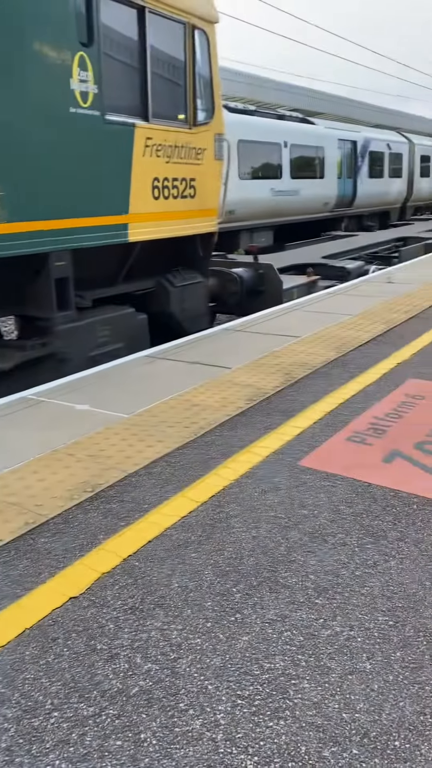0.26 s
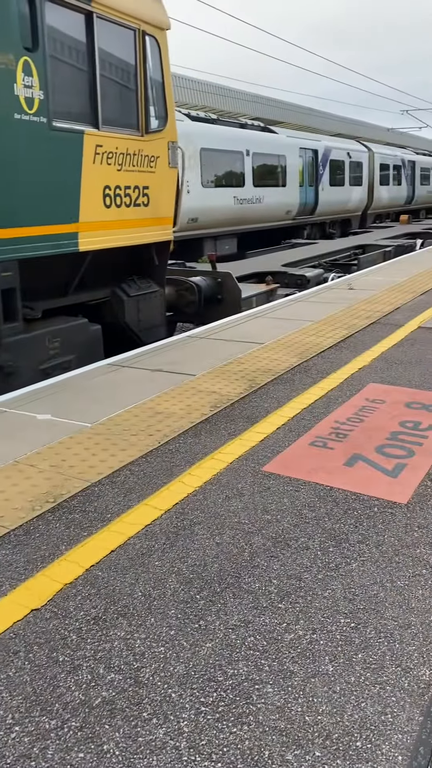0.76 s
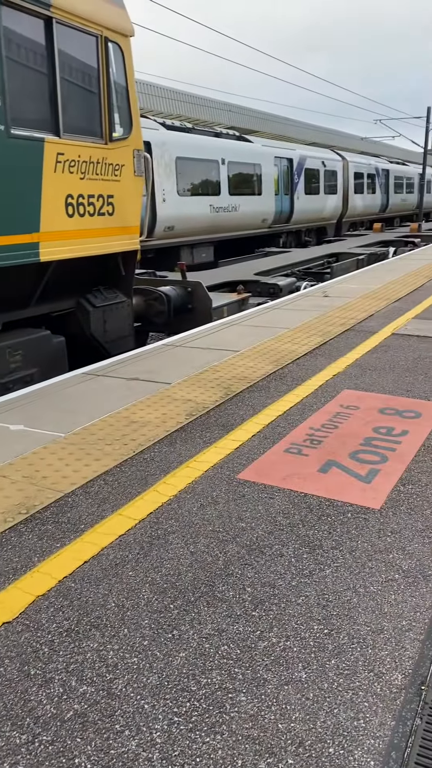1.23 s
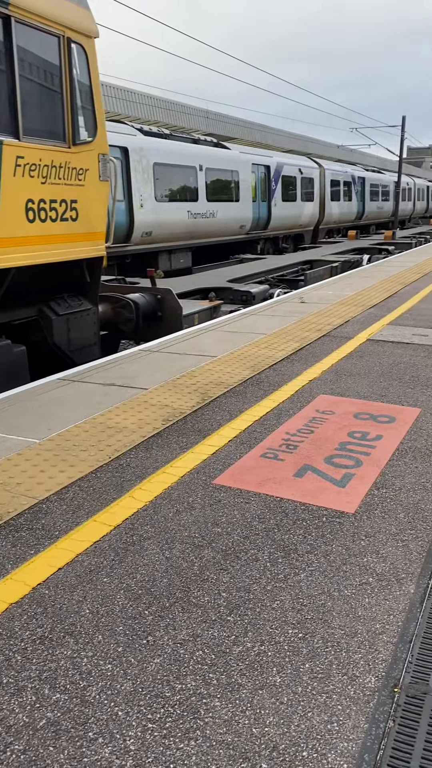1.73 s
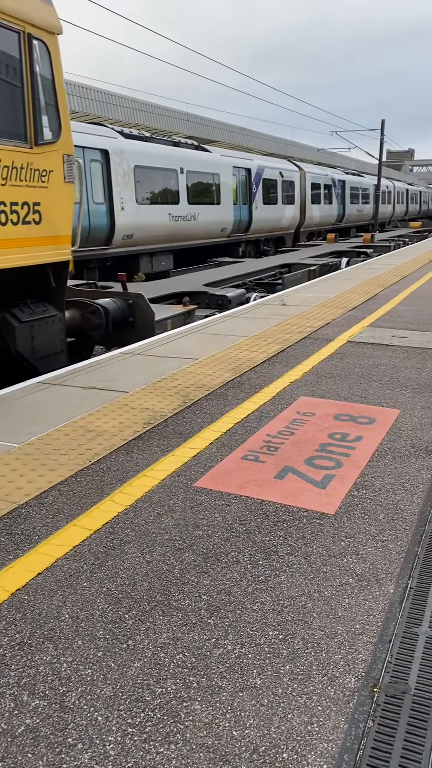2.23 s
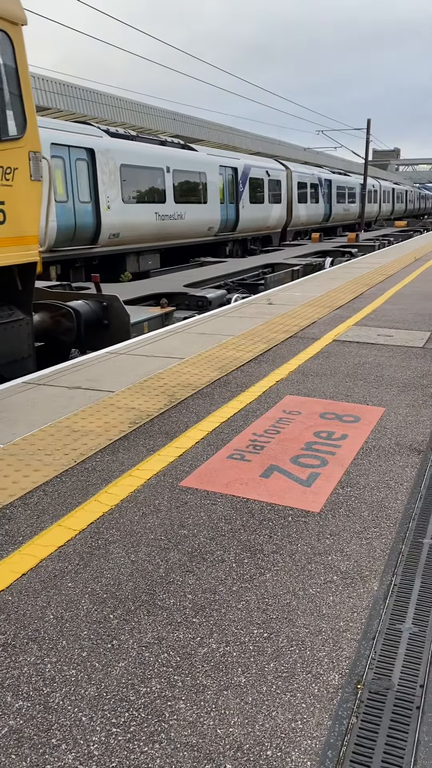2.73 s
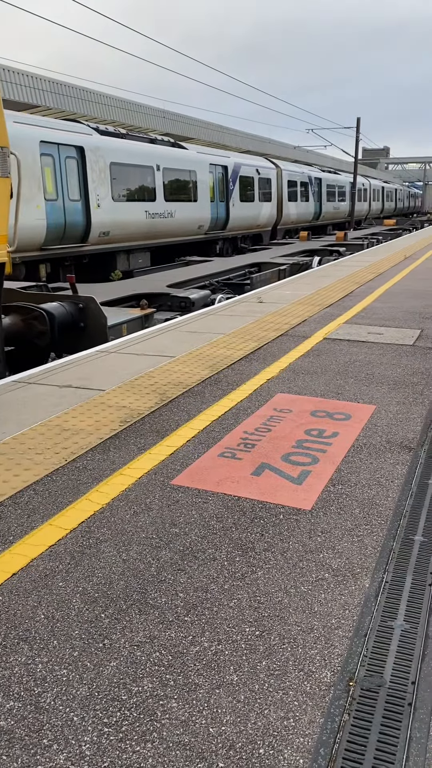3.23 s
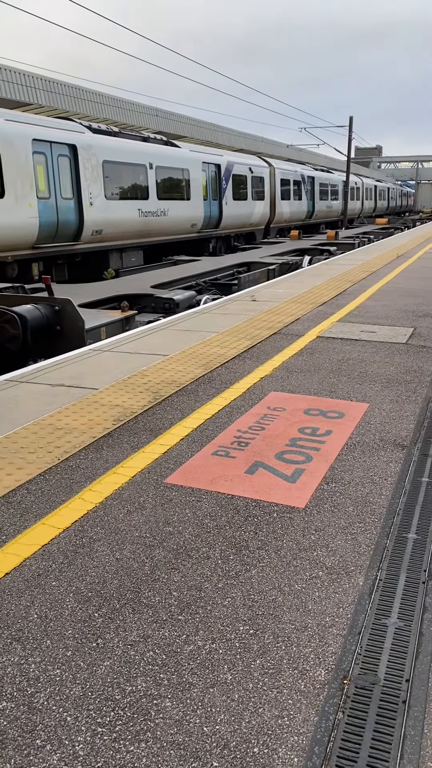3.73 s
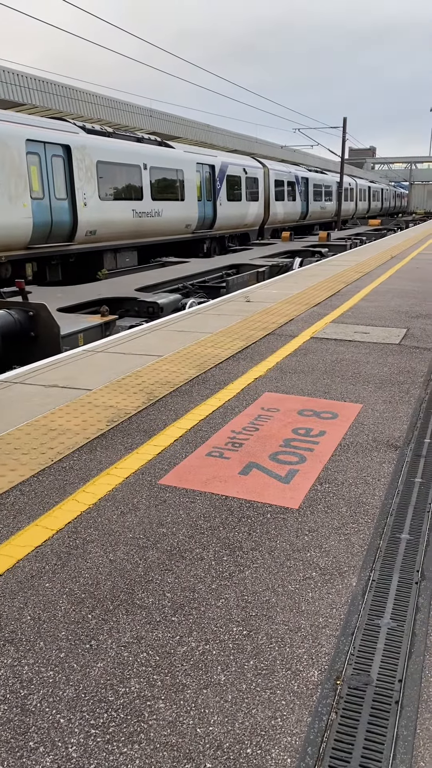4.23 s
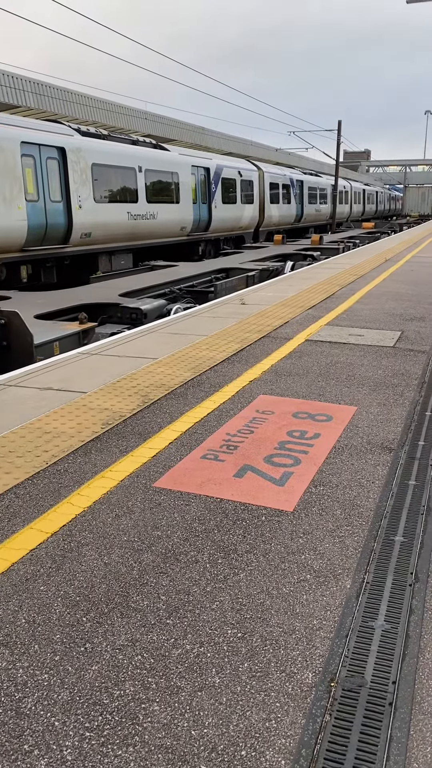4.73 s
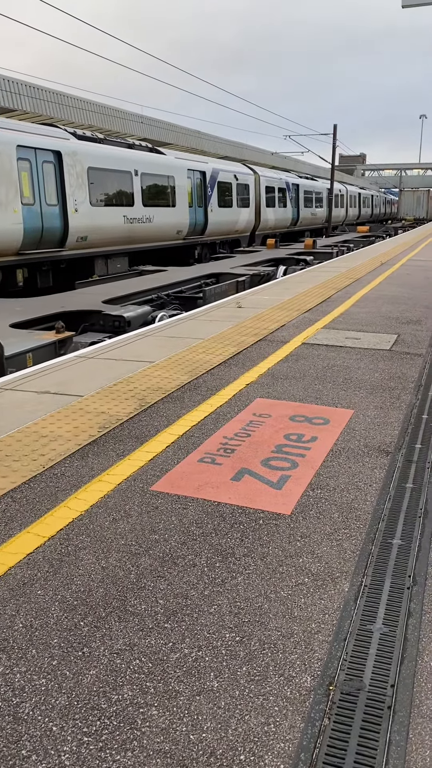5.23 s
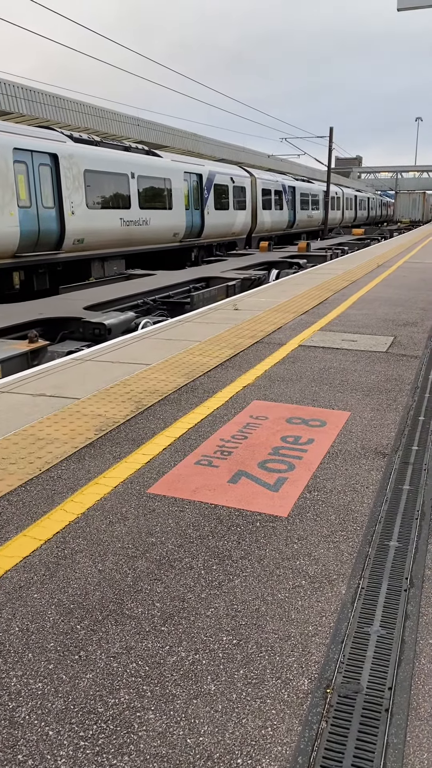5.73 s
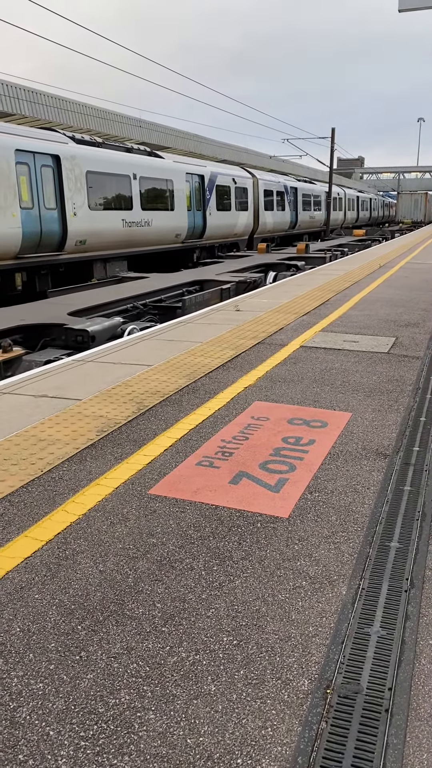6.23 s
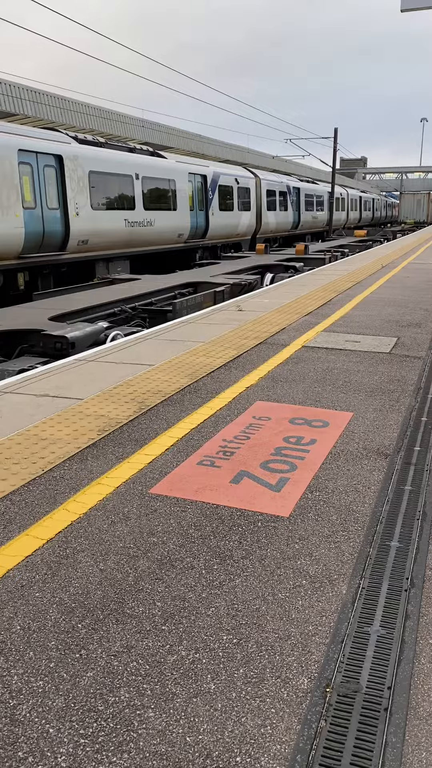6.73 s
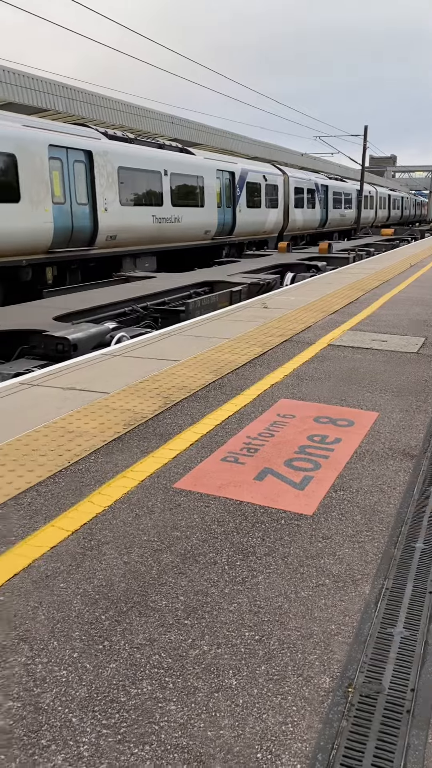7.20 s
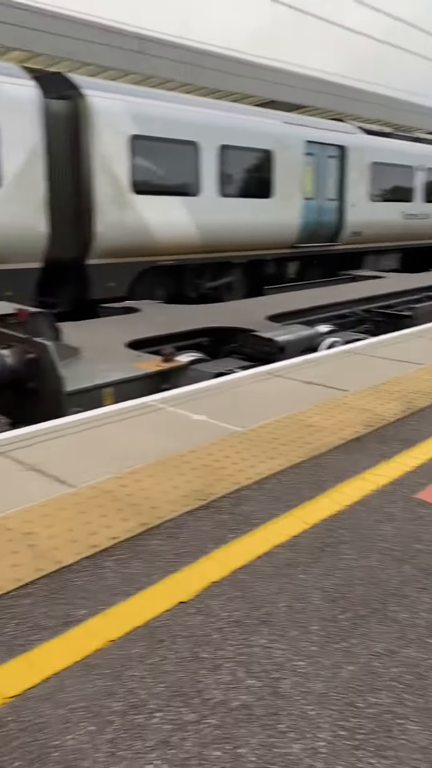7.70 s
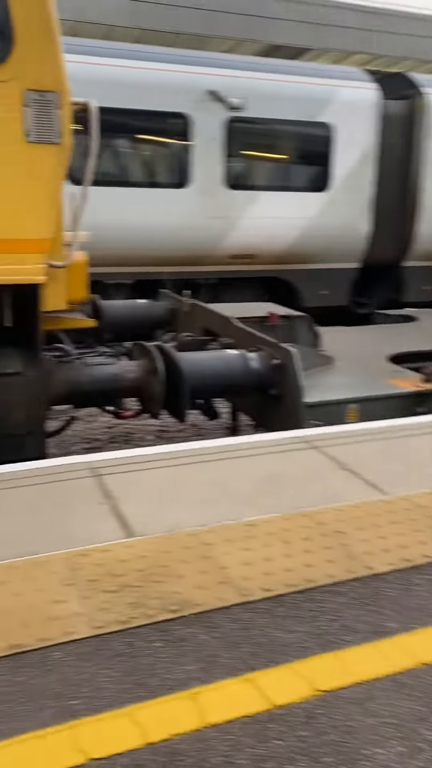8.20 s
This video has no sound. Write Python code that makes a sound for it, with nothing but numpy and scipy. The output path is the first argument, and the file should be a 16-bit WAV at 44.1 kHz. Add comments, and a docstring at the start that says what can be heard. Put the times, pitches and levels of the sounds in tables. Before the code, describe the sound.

A heavy low diesel throb dominates, covered by mechanical clatter, a hollow drone and wavering gear and turbocharger whines. Early on a metallic squeal sings upward for under a second. Halfway through, the engine begins speeding up and all its tones climb together, growing hoarser. Empty wagons roll by with uneven rumble and soft frame booms, and escaping air hisses late. Outdoor platform, close stereo phone-like pickup, no speech.

```python
"""A two-stroke diesel locomotive draws container flats slowly along a station platform.
Its exhaust throbs once a crank turn, as neighbouring low tones fall into step.
Gears, turbocharger and auxiliaries whine, and their pitch climbs as the engine is notched up.
A wheel flange squeals briefly as a rising tone; wagon rumble, jolts and hissing air are shaped from
filtered noise and short rings."""
import sys
import numpy as np
from scipy import signal
from scipy.fft import rfft, irfft, next_fast_len
from scipy.io import wavfile
from scipy.ndimage import uniform_filter1d, map_coordinates

SR = 44100
rng = np.random.default_rng(int(sys.argv[2]) if len(sys.argv) > 2 else 0)


def materialize(psi):
    """Save the field psi as 16-bit PCM at rate SR to the path in sys.argv[1].

    A 1-D psi becomes a single channel; in a 2-D psi each row is a channel.
    """
    bounded = np.clip(np.atleast_2d(psi).T, -1, 1)
    quanta = np.round(bounded * 32767).astype(np.int16)
    wavfile.write(sys.argv[1], SR, quanta)


N = 373086
TIME = np.arange(N) / SR

# crankshaft speed: (time [s], speed [turns per second])
SHAFT = [(0, 8.149), (1.6, 8.168), (2.4, 8.147), (4.4, 8.147), (4.8, 8.196), (5.2, 8.288), (5.6, 8.421),
         (6.4, 8.766), (7.2, 9.215), (8.46, 9.943)]
# the low multiples of the crank speed that make up the throb: (order)
THROB_ORDERS = [6, 7, 8, 9]
# exhaust surge within a turn: (time [s], delay [turns], smear by echoes [turns per order])
SURGE = [(0, 1.02, .15), (2, 1.04, .2), (4.8, 1.07, .25), (5.5, 1.15, .16), (6.1, 1.11, .23),
         (6.5, .65, -.06), (7.3, .72, -.22), (7.8, .79, -.25), (8.46, 1.06, .11)]
# how the engine's noises grow, before a fixed lift: (time [s], clatter [dB], cooling air [dB])
AIR = [(0, -35.5, -42), (1.9, -34, -40.5), (5, -34, -40.5), (6, -33, -38.5), (7.1, -34.5, -36.5),
       (7.6, -33, -38.5), (8.25, -29.5, -36), (8.46, -31, -35)]


def amp(db):
    """Turn decibels into gain."""
    return 10 ** (np.asarray(db) / 20)


def unit(x):
    """Scale to rms 1."""
    return x / np.sqrt(np.mean(x ** 2) + 1e-20)


def along(points, hz):
    """Read (frequency, value) points along a logarithmic frequency axis."""
    f, v = np.transpose(points)
    return np.interp(np.log(hz + 1), np.log(f + 1), v)


def curves(rows):
    """Draw each column after the time as a curve with one value per sample."""
    s, *cols = np.transpose(rows)
    return [np.interp(TIME, s, c) for c in cols]


def wobble(rate):
    """Draw a smooth random curve with this many knots a second."""
    knots = rng.standard_normal(8192)
    coarse = TIME[::16]
    return np.interp(TIME, coarse, map_coordinates(knots, [coarse * rate], mode="wrap"))


def filtered(x, response):
    """Multiply the spectrum of x by a response that depends on frequency."""
    m = next_fast_len(N + SR // 2)
    spectrum = rfft(x, m) * response(np.fft.rfftfreq(m, 1 / SR))
    return irfft(spectrum, m)[..., :N]


def coloured(pair, spectrum):
    """Turn two unrelated noises into one stereo noise with this spectrum, its middle at rms 1."""
    # left-right likeness of the train's noise: (frequency [Hz], likeness [0-1])
    likeness = [(50, 0.98), (130, 0.99), (250, 1), (450, 0.73), (1000, 0.35), (1700, 0.6), (2600, 0.73),
                (3800, 0.65), (5000, 1), (8000, 1), (12000, 1)]

    def response(hz):
        alike = np.clip(along(likeness, hz), 0, 1)
        return amp(along(spectrum, hz)) * np.sqrt([1 + alike, 1 - alike])

    mid, side = filtered(pair, response)
    return np.array([mid + side, mid - side]) / np.std(mid)


def rush(spectrum, patchy_db):
    """Make stereo turbulence: noise whose gain varies in patches of time and pitch."""
    z = signal.stft(rng.standard_normal((2, N)), nperseg=512)[2]
    field = rng.standard_normal(z.shape[1:])
    field = uniform_filter1d(uniform_filter1d(field, 6, 0), 10, 1)
    noise = signal.istft(z * amp(patchy_db * unit(field)), nperseg=512)[1][:, :N]
    return coloured(noise, spectrum)


def tone(cycles, scatter, rate, width):
    """Make a stereo tone near rms 1: a direct path plus shifting reflections, partly unlike at each ear."""
    angle = (2 * np.pi * (cycles % 1)).astype(np.float32)
    direct, late = np.cos(angle), np.sin(angle)

    def reflections():
        return wobble(rate) * direct + wobble(rate) * late

    mid = (direct + scatter * reflections()) / np.sqrt(1 + 2 * scatter ** 2)
    side = width * reflections()
    return np.sqrt(2) * np.array([mid + side, mid - side])


def exhaust(turns):
    """Low orders fall into step once a turn, the deep throb; each swells and fades in standing waves."""
    # strength of the throb: (time [s], relative level [dB], tilt [dB per order])
    strength = [(0, -3.5, -2), (2, -0.3, -1.3), (3.3, 0, 0.4), (4.1, -0.2, .3), (4.9, 1, 2),
                (5.5, 0.6, -1.9), (6.4, 0.3, -1.7), (7.2, 0.1, -2.6), (8.46, 2, 0)]
    # standing waves between the locomotive and a parked train favour some low pitches
    # and cancel others: (frequency [Hz], level [dB])
    standing = [(48.8, -24.6), (49.5, -30), (51.3, -19), (54.5, -24), (56.6, -31), (57.4, -21), (61, -21.4),
                (62.5, -17.3), (65.2, -24.7), (70, -28), (74.3, -17.7), (77, -17.6), (78.6, -24), (81, -17),
                (87, -27)]
    waver_db = .5
    delay, smear = curves(SURGE)
    level_db, tilt_db = curves(strength)
    speed = curves(SHAFT)[0]
    out = np.zeros(N)
    for order in THROB_ORDERS:
        offset = order - np.mean(THROB_ORDERS)
        cycles = order * turns - offset * delay - smear * offset ** 2 / 2
        db = level_db + offset * tilt_db + along(standing, order * speed)
        out += amp(db + waver_db * wobble(5.7)) * np.cos(2 * np.pi * cycles)
    return np.sqrt(2) * out


def drone(turns):
    """A low hum keeps step with the exhaust surge; weaker engine orders fade as the locomotive leaves."""
    # the hum just above the throb: (time [s], level [dB])
    hum_level = [(0, -40), (.7, -32), (2, -34), (2.7, -47), (4.1, -33), (4.8, -35), (5.5, -22), (6.8, -34),
                 (8.46, -41)]
    # weaker engine orders: (multiple of the crank speed, level before the fading [dB])
    weak_orders = [(5, -33), (11, -33), (20, -40), (24, -38.5), (25, -39.5), (28, -43), (30, -39),
                   (33, -44), (37, -43), (41, -40.5), (42, -43), (47, -45), (51, -42), (72, -42), (74, -42),
                   (88, -47), (89, -44), (90, -45)]
    # the weaker orders fade as the locomotive draws away: (time [s], gain [dB])
    receding = [(3.5, 0.5), (6.5, -7.5)]
    hum_order = 10
    lag = (hum_order - np.mean(THROB_ORDERS)) * curves(SURGE)[0]
    hum = amp(curves(hum_level)[0]) * tone(hum_order * turns - lag, scatter=.35, rate=3.14, width=.03)
    lines = np.zeros((2, N))
    for order, db in weak_orders:
        cycles = order * turns + rng.random()
        lines += amp(db) * tone(cycles, scatter=.35, rate=4, width=min(order / 150, .4))
    return hum + lines * amp(curves(receding)[0])


def block(turns):
    """Engine orders swell when the changing speed brings them near the block's resonances."""
    # block resonances: (order, frequency [Hz], width [Hz], peak level [dB])
    resonances = [(16, 160.6, 9.8, -29), (30, 299, 30, -30), (34, 295, 30, -36.5)]
    speed = curves(SHAFT)[0]
    out = np.zeros((2, N))
    for order, hz, width, db in resonances:
        detuning = 2 * (order * speed - hz) / width
        gain = amp(db) / np.hypot(1, detuning)
        out += gain * tone(order * turns, scatter=.83, rate=9, width=.096)
    return out


def chug(turns):
    """Gain of rms 1: every firing has its own strength, and the whole swells once a turn."""
    firings_per_turn = 12
    grain_db, swell_db = 1.1, .5  # unevenness of the firings, depth of the swell
    peak_turn = .97  # where in the turn the swell peaks
    firings = turns * firings_per_turn
    strength = np.exp(.5 * rng.standard_normal(2048))[firings.astype(int)]
    bursts = unit(strength * np.sin(np.pi * firings) ** 2 - np.mean(strength) / 2)
    swell = swell_db * np.cos(2 * np.pi * (turns - peak_turn))
    return unit(amp(grain_db * np.minimum(bursts, 3) + swell))


def clatter(turns):
    """Injectors, valves and firings make nearly the same rattle on every turn."""
    # colour of the clatter: (frequency [Hz], relative level [dB per Hz])
    colour = [(60, -3), (150, -3.5), (240, -7.5), (310, -1.5), (400, -3), (530, -7), (610, -4), (730, -3),
              (810, -8.5), (1100, -10), (1400, -10.5), (1750, -20), (2400, -21.5), (3200, -29.5),
              (6000, -60), (9000, -120)]
    size = 5400  # noise points per turn
    memory = .9  # share of each turn's pattern carried into the next
    fresh = rng.standard_normal((2, int(turns[-1]) + 40, size))
    repeating = signal.lfilter([1], [1, -memory], fresh, axis=1)
    repeating = repeating[:, 30:].reshape(2, -1)  # skip the turns where the pattern builds up
    rattle = unit(np.array([np.interp(turns * size, np.arange(len(r)), r) for r in repeating]))
    # with distance the echoes blur the pattern
    blur = np.interp(TIME, [0, 4, 7], [.25, .4, .75])
    mix = np.sqrt(1 - blur) * rattle + np.sqrt(blur) * rng.standard_normal((2, N))
    return amp(curves(AIR)[0] + 9) * chug(turns) * coloured(mix, colour)


def hollow():
    """The engine compartment drones as a narrow, hollow band of noise."""
    # the drone near 240 Hz: (frequency [Hz], relative level [dB per Hz])
    colour = [(140, -60), (205, -8), (225, -1), (250, 0), (270, -7), (360, -60)]
    # strongest as the cab end passes: (time [s], level [dB])
    level = [(0, -36), (1.4, -29.5), (2.6, -27.5), (3.3, -33), (4.2, -34), (5.2, -30.5), (5.9, -36),
             (6.35, -28.5), (7, -39), (8.46, -46)]
    return amp(curves(level)[0]) * coloured(rng.standard_normal((2, N)), colour)


def flutter(turns, peak_turn, share):
    """Gain that swells once a crank turn and keeps the mean power."""
    # the whines pulse most deeply as the cab end passes; below zero, the peak becomes the dip:
    # (time [s], depth before a share is taken [dB])
    depth = [(0, -3), (1.4, -4), (2.4, 4), (3.4, 7), (4, -4), (4.9, -3), (8.46, -1)]
    depth_db = share * curves(depth)[0]
    mean_power = np.i0(depth_db * np.log(10) / 10)
    return amp(depth_db * np.cos(2 * np.pi * (turns - peak_turn))) / np.sqrt(mean_power)


def hoarse(cycles, width):
    """A gear tone near rms 1 with a ragged, quickly wavering skirt."""
    # the tone grows hoarse once the engine is notched up: (time [s], ragged share of power [0-1])
    ragged_share = [(0, .05), (4.8, .06), (5.8, .22), (8.46, .25)]
    share = curves(ragged_share)[0]
    clear = tone(cycles, scatter=.18, rate=30, width=width)
    ragged = tone(cycles + .25, scatter=6, rate=85, width=width)
    return np.sqrt(1 - share) * clear + np.sqrt(share) * ragged


def gears(turns):
    """Timing gears whine at their tooth rate and its harmonics; uneven torque adds pulses and sidebands."""
    # the tooth tone: (time [s], level [dB])
    mesh_level = [(0, -35), (1.4, -31), (2.7, -48), (3.3, -32), (4.5, -39), (6.6, -32.5), (7.08, -38.5),
                  (7.22, -27.5), (7.55, -30), (7.9, -22.5), (7.99, -33.5), (8.27, -20.5), (8.46, -30)]
    # its two upper sidebands, spaced by the crank speed: (time [s], level [dB])
    sidebands = [(0, -38), (1.6, -40), (2.7, -43), (3.2, -45), (4, -36.5), (4.8, -43.5), (6, -53),
                 (8.46, -41)]
    # its octave, before the slow beating: (time [s], level [dB])
    octave_level = [(0, -36), (.85, -34), (1.4, -43), (2.45, -33.5), (2.68, -39), (2.95, -30.5), (3.3, -43),
                    (3.65, -33.5), (3.95, -41), (4.65, -33), (5.05, -31), (5.3, -35), (5.55, -30.5),
                    (5.9, -32), (6.1, -37), (6.32, -28), (6.5, -34), (6.68, -28.5), (6.85, -34), (7.1, -34),
                    (7.28, -37), (7.45, -31.5), (7.9, -33.5), (8.46, -35)]
    # its third harmonic: (time [s], level [dB])
    third_level = [(0, -47), (.8, -44), (3.2, -44), (4.5, -47), (5, -43.5), (6, -51), (6.5, -44), (7, -50),
                   (8.46, -49)]
    # an idler gear's tone: (time [s], level [dB])
    idler_level = [(0, -40), (5.5, -45.5), (7, -41.5), (8.3, -35.5)]
    # the idler's octave comes and goes as the engine gathers speed: (time [s], mean level [dB])
    idler_octave = [(0, -54), (1.3, -47), (4.6, -47), (5.35, -52), (5.55, -40), (5.72, -50), (5.86, -40),
                    (6.05, -54), (6.25, -49), (6.42, -38), (6.75, -45), (6.95, -41), (7.45, -44),
                    (7.58, -34), (7.7, -45), (7.85, -40), (8.15, -35), (8.46, -41)]
    fourth_db = -48
    mesh_share, octave_share = .51, .4  # shares of the flutter depth
    octave_peak_turn, idler_peak_turn = .91, .47  # where in the turn each octave peaks
    beat_hz, beat_db = 2, 1.3  # echoes beat slowly against the octave
    idler_pulse_db = 2

    twist = .02 * np.sin(2 * np.pi * turns) + .025 * wobble(20)
    mesh = 79 * turns + twist
    idler = 117 * turns + twist
    loaded = curves(SURGE)[0] + .11  # the teeth are loaded this many turns after the exhaust surge

    first = amp(curves(mesh_level)[0]) * flutter(turns, loaded, mesh_share)
    whine = first * tone(mesh, scatter=.22, rate=18, width=.3)
    for k in (1, 2):
        sideband = tone(mesh + k * (turns - loaded), scatter=.3, rate=12, width=.3)
        whine += amp(curves(sidebands)[0]) * sideband

    beat = beat_db * np.sin(2 * np.pi * beat_hz * TIME)
    second = amp(curves(octave_level)[0] + beat) * flutter(turns, octave_peak_turn, octave_share)
    whine += second * hoarse(2 * mesh, width=.11)
    third = amp(curves(third_level)[0]) * flutter(turns, loaded, octave_share)
    whine += third * tone(3 * mesh, scatter=.45, rate=45, width=.15)
    whine += amp(fourth_db) * tone(4 * mesh, scatter=.94, rate=59, width=.19)

    pulse = idler_pulse_db * np.cos(2 * np.pi * (turns - idler_peak_turn))
    whine += amp(curves(idler_octave)[0] + pulse) * hoarse(2 * idler, width=.13)
    return whine + amp(curves(idler_level)[0]) * tone(idler, scatter=1, rate=25, width=.16)


def auxiliaries(turns):
    """Fast pumps and blowers whistle high above the gears, one loud and coming in flares, two faint."""
    # the loud whistle between flares: (time [s], level [dB])
    between = [(0, -49), (1.9, -52), (2.2, -47), (2.8, -52), (4.1, -50), (4.35, -45.5), (4.7, -44.5),
               (4.98, -38), (5.12, -44.5), (7, -44.5), (7.75, -46), (8.46, -42.5)]
    # it flares up and drops away: (start [s], length [s], level before a fixed lift [dB])
    flares = [(0.47, 0.031, -37.9), (0.555, 0.068, -36.8), (0.705, 0.07, -41.0), (0.916, 0.087, -38.2),
              (1.03, 0.04, -37.7), (1.144, 0.043, -40.7), (1.277, 0.101, -38.8), (1.413, 0.055, -36.8),
              (1.521, 0.049, -39.0), (1.663, 0.054, -39.0), (1.799, 0.054, -41.8), (2.095, 0.031, -42.3),
              (2.243, 0.082, -42.5), (2.382, 0.037, -40.3), (2.5, 0.083, -40.1), (2.629, 0.069, -41.9),
              (2.76, 0.051, -41.5), (2.856, 0.059, -36.9), (2.931, 0.051, -38.0), (3.008, 0.05, -36.3),
              (3.116, 0.063, -37.7), (3.229, 0.059, -36.9), (3.365, 0.062, -37.1), (3.475, 0.046, -37.7),
              (3.587, 0.104, -38.3), (3.745, 0.065, -38.5), (3.859, 0.062, -41.0), (4.462, 0.074, -43.6),
              (4.689, 0.046, -42.0), (4.837, 0.088, -35.8), (5.364, 0.042, -42.3), (5.449, 0.077, -41.9),
              (5.635, 0.134, -41.5), (5.914, 0.101, -42.6), (6.136, 0.094, -41.7), (6.248, 0.039, -42.9),
              (6.411, 0.036, -41.3), (6.503, 0.102, -39.8), (6.647, 0.038, -43.2), (6.789, 0.087, -41.7),
              (7.202, 0.058, -40.2), (7.286, 0.096, -40.5), (7.446, 0.075, -41.9), (8.134, 0.056, -41.1),
              (8.321, 0.046, -41), (8.431, 0.025, -39.2)]
    # the two faint whistles beside it: (time [s], upper [dB], lower [dB])
    faint = [(0, -57, -53), (1.1, -56, -54), (2.2, -51, -54), (2.7, -56, -49), (3.3, -58, -53),
             (5.2, -56, -54), (5.7, -68, -55), (5.92, -68, -43), (6.45, -70, -48), (6.8, -72, -60)]
    flare_width = .72  # half-width of a rounded flare as a share of its length
    main, upper, lower = 515 * turns, 567 * turns, 503.5 * turns
    upper_db, lower_db = curves(faint)
    gain = amp(curves(between)[0])
    for s, length, db in flares:
        away = np.minimum(np.abs(TIME - s - length / 2) / (flare_width * length), 3)
        gain = np.maximum(gain, amp(db + 1.5) * np.exp(-away ** 2.5))
    # as the pitch glides, late echoes beat against the direct tone
    beating = np.interp(TIME, [4.9, 5.6], [.2, .55])
    whistle = gain * tone(main + .06 * wobble(60), scatter=beating, rate=60, width=.1)
    whistle += amp(upper_db) * tone(upper, scatter=.36, rate=10, width=.2)
    return whistle + amp(lower_db) * tone(lower, scatter=.7, rate=40, width=.3)


def turbo(turns):
    """The gear-driven turbocharger sings a breathy blade tone that grows hoarser with load."""
    # turbocharger whistle: (time [s], level [dB])
    level = [(0, -47.5), (2.5, -49), (3.7, -48), (5, -47.5), (6.3, -48), (7.3, -47.5), (8.46, -46)]
    blades = 939.5 * turns
    clear = np.interp(TIME, [4, 7], [.3, .04])  # share of power in the clearer core
    core = tone(blades, scatter=1.6, rate=50, width=.21)
    skirt = tone(blades, scatter=2.9, rate=180, width=.051)
    skirt += amp(.5) * tone(blades, scatter=3.3, rate=460, width=.022)
    return amp(curves(level)[0]) * (np.sqrt(clear) * core + np.sqrt(1 - clear) * unit(skirt))


def flange():
    """A wheel flange rubs the rail and sings, rising slightly, with two harmonics."""
    # squeal: (time [s], pitch [Hz], level [dB], second harmonic [dB], third harmonic [dB])
    squeal = [(0, 3260, -70, -78, -68), (.17, 3270, -58, -60, -59), (.21, 3272, -45.5, -57, -59),
              (.27, 3280, -42.5, -54, -58), (.38, 3290, -44, -58, -55), (.45, 3310, -46, -58, -55),
              (.54, 3370, -41.5, -68, -64), (.63, 3385, -44, -68, -50), (.72, 3415, -37.5, -67, -46),
              (.81, 3450, -40, -58, -52), (.88, 3470, -75, -85, -90)]
    hz, *levels = curves(squeal)
    cycles = np.cumsum(hz * (1 + .00325 * wobble(35))) / SR
    out = np.zeros((2, N))
    for harmonic, db in enumerate(levels, start=1):
        out += amp(db) * tone(harmonic * cycles, scatter=.22, rate=80, width=.14)
    return out


def wagons():
    """Wheels and empty decks rumble in uneven swells, and each jolt makes a frame boom briefly."""
    # rumble grows as the flats draw level: (time [s], level before a fixed lift [dB])
    level = [(0, -34), (.9, -29.5), (1.6, -34.5), (2.7, -27.5), (3.5, -26), (4, -26), (4.5, -27),
             (4.95, -27.5), (5.3, -24.5), (5.9, -25), (6.35, -23.5), (7.25, -25.5), (7.75, -23.5),
             (8.46, -22.5)]
    # colour of the rumble: (frequency [Hz], relative level [dB per Hz])
    colour = [(20, -24), (32, -3), (50, 12), (85, 12), (115, 6.5), (180, 3), (300, -6.5), (500, -5.5),
              (1200, -56), (5000, -120)]
    # dull jolts of the frames: (time [s], boom [dB], knock [dB]), before each mode's own level
    jolts = [(3.25, -17, -25), (3.818, -19, -21), (3.963, -14.5, -14.5), (4.045, -16, -20),
             (4.465, -18.5, -19), (5.27, -18.5, -25), (5.36, -17, -30), (5.677, -20, -18.5),
             (6.18, -18, -32), (6.257, -23, -21), (6.331, -15, -16.5), (6.387, -22, -20),
             (6.648, -14.5, -28), (6.706, -19.5, -21), (6.764, -21, -20), (7.03, -20, -18.5),
             (7.59, -18, -22), (7.707, -16, -22), (7.785, -15.5, -22)]
    # what a jolted frame rings with, low modes the boom and high ones the knock:
    # (typical frequency [Hz], relative level [dB], time to fall by 60 dB [s])
    frame = [(122, -2, .22), (160, -.5, .22), (195, -1.5, .2), (250, 0, .18), (305, -2, .16),
             (380, -5, .14)]
    knock_above_hz = 210
    swell_db, swells_per_s = 1.5, 12  # unevenness of the rolling
    swells = swell_db * wobble(swells_per_s)
    rolling = amp(curves(level)[0] + 2.5 + swells) * rush(colour, patchy_db=1.5)
    booms = np.zeros(N + SR)
    age = np.arange(SR // 2) / SR
    for s, boom_db, knock_db in jolts:
        for hz, mode_db, t60 in frame:
            db = knock_db if hz > knock_above_hz else boom_db
            pitch = hz * (1 + .051 * rng.standard_normal())
            ring = np.sin(2 * np.pi * (pitch * age + rng.random()))
            onset = 1 - np.exp(-age / .0026)
            booms[round(s * SR):][:len(age)] += amp(db + mode_db - 60 * age / t60) * onset * ring
    return rolling + booms[:N]


def air(turns):
    """Cooling air rushes, roughened by the firings; escaping air hisses thinly, with two spits and a puff."""
    # colours of the cooling air and the hiss: (frequency [Hz], relative level [dB per Hz])
    fan_colour = [(300, 1.5), (1000, 8), (2000, 3), (2700, 5), (3300, 2), (4100, 0), (5000, -5.5),
                  (5800, -9.5), (6600, -27.5), (8200, -18), (9500, -23), (12000, -29.5), (15500, -32)]
    hiss_colour = [(2500, -12), (5000, 5), (6500, 5.5), (8000, 4), (9500, 3.5), (11500, 1.5), (12700, -21),
                   (14300, -26), (15400, -19), (15800, -21)]
    # hiss of escaping air, before a fixed lift: (time [s], level [dB])
    leak = [(0, -66.5), (5, -77.5), (6, -62), (6.9, -61), (7.2, -53.5), (7.9, -57.5), (8.46, -48)]
    # a soft puff, before the same lift: (time [s], level [dB], attack [s])
    puffs = [(6.98, -51.5, 0.074)]
    # two sharp spits, before the same lift: (time [s], level [dB])
    spits = [(.159, -50), (.188, -52)]
    puff_fall_s = .062
    spit_hold_s, spit_fall_s = .012, .008
    fans = amp(curves(AIR)[1] + 6) * chug(turns) * rush(fan_colour, patchy_db=1.8)
    escape = amp(curves(leak)[0])
    for s, db, attack in puffs:
        age = TIME - s
        fall = np.exp(-np.maximum(age - attack, 0) / puff_fall_s)
        escape = escape + amp(db) * np.clip(age / attack, 0, 1) * fall
    for s, db in spits:
        fall = np.exp(-np.maximum(TIME - s - spit_hold_s, 0) / spit_fall_s)
        escape = escape + amp(db) * (TIME > s) * fall
    return fans + amp(6.5) * escape * rush(hiss_colour, patchy_db=1.5)


def scene():
    """Add the engine, which follows the crankshaft, to the flange, wagons and air."""
    turns = np.cumsum(curves(SHAFT)[0]) / SR
    engine = exhaust(turns) + drone(turns) + block(turns) + clatter(turns) + hollow()
    whines = gears(turns) + auxiliaries(turns) + turbo(turns)
    return engine + whines + flange() + wagons() + air(turns)


def record(dry):
    """The two microphones differ in colour and timing and keep nothing above the band limit."""
    # difference in loudness: (frequency [Hz], left minus right [dB])
    tilt = [(60, -0.5), (110, 0.5), (200, -1.0), (380, -3), (700, 1), (1290, 2.5), (2380, 0.5), (4400, 1.5),
            (8120, -0.5), (15000, 0.5)]
    # the two ports hear the train in and out of step: (frequency [Hz], left lead [radians])
    lead = [(30, 0), (110, 0), (250, -0.2), (780, 0.82), (2070, 0.52), (3010, 2), (3700, 1.5), (4350, .5),
            (5600, 0.9), (6400, 1.5), (7200, 2.5), (8300, 4), (9600, 5.5), (11700, 5), (12700, 18.5),
            (14500, -20), (15400, 25)]
    top_hz = 15800

    def ports(hz):
        left_over_right = amp(along(tilt, hz)) * np.exp(1j * along(lead, hz))
        # half of the difference goes to each side
        return left_over_right ** np.array([[.5], [-.5]]) * (hz < top_hz)

    return filtered(dry, ports)


dry = scene()
out = record(dry)
materialize(out)
```